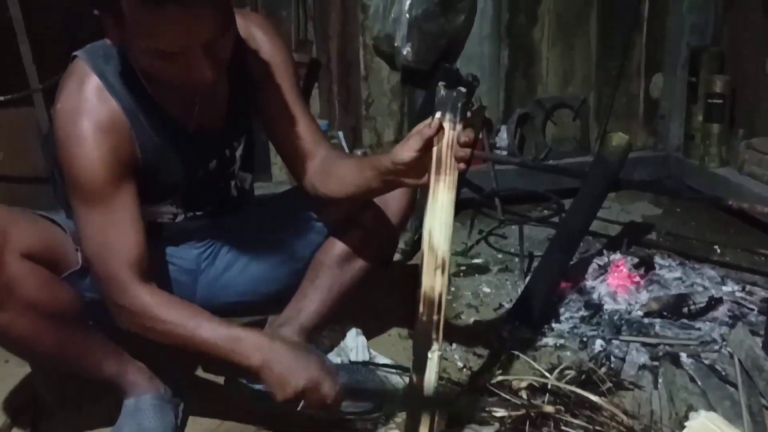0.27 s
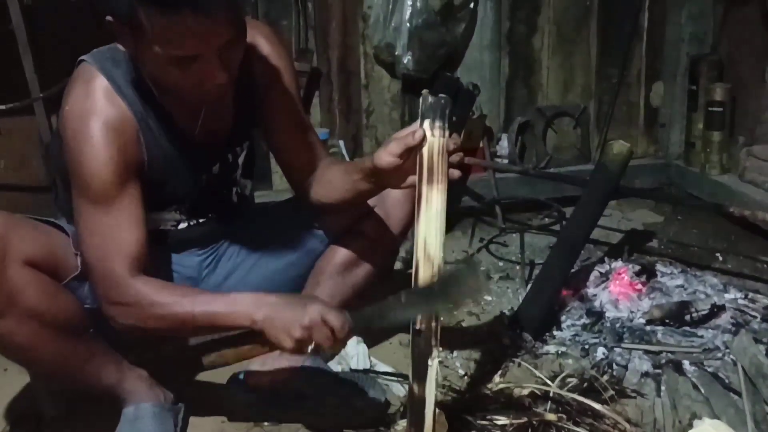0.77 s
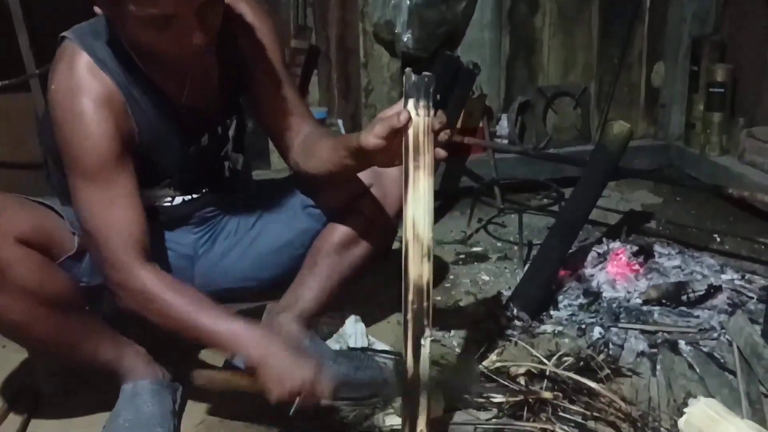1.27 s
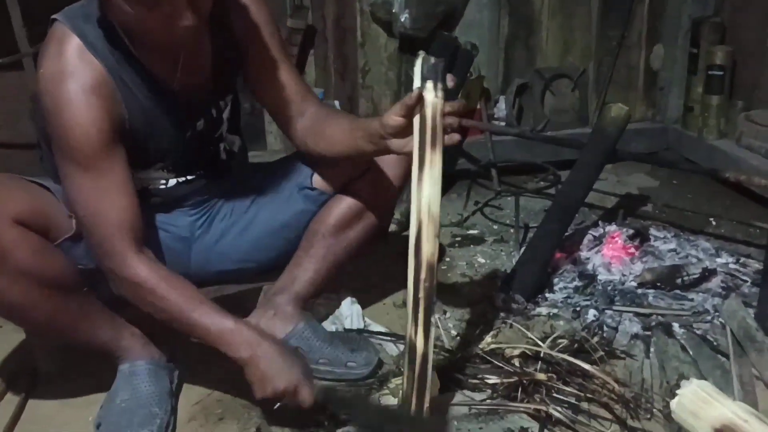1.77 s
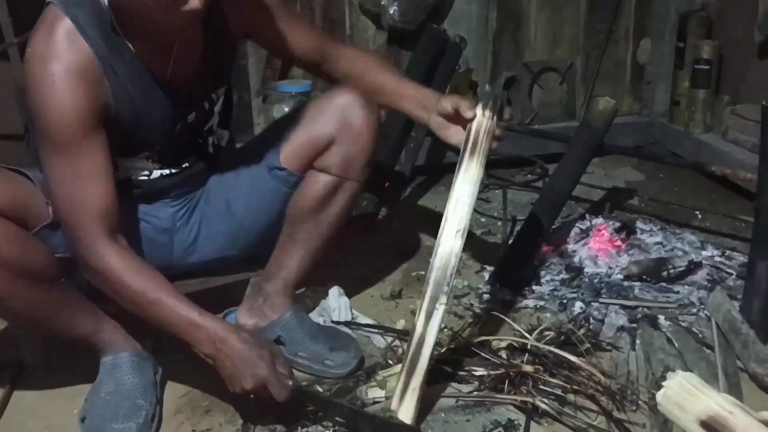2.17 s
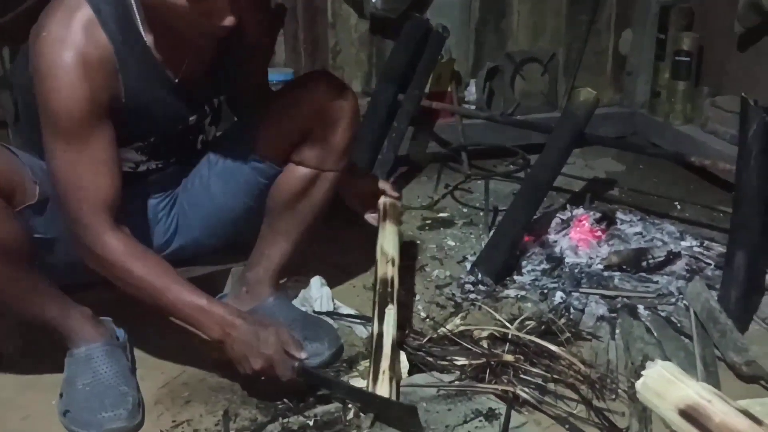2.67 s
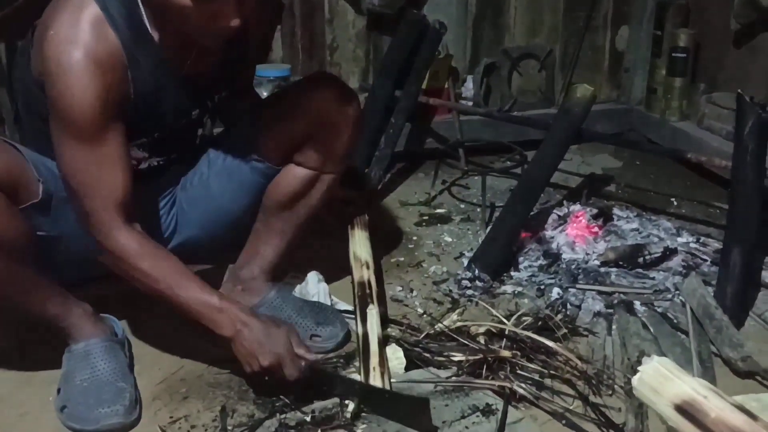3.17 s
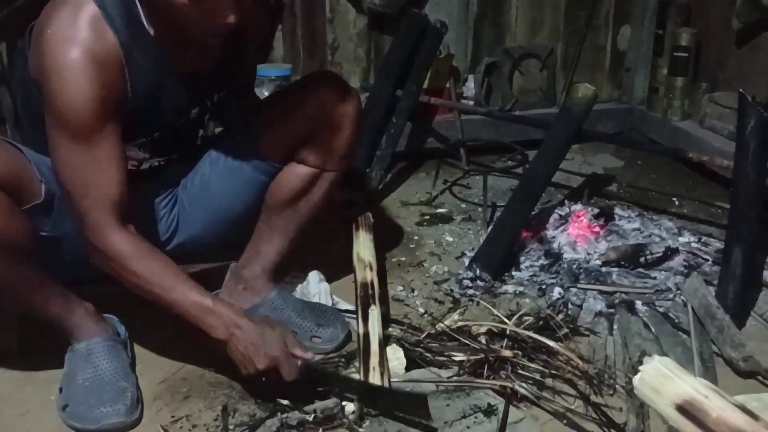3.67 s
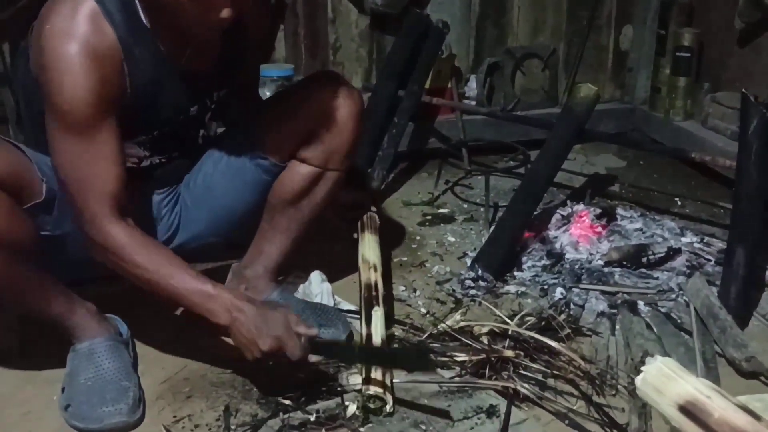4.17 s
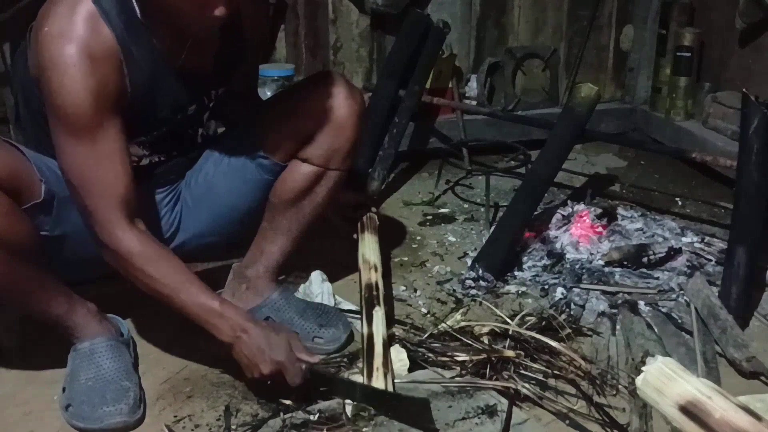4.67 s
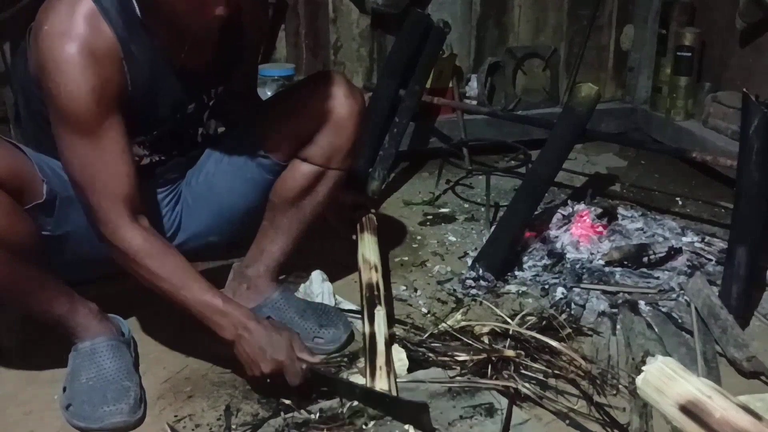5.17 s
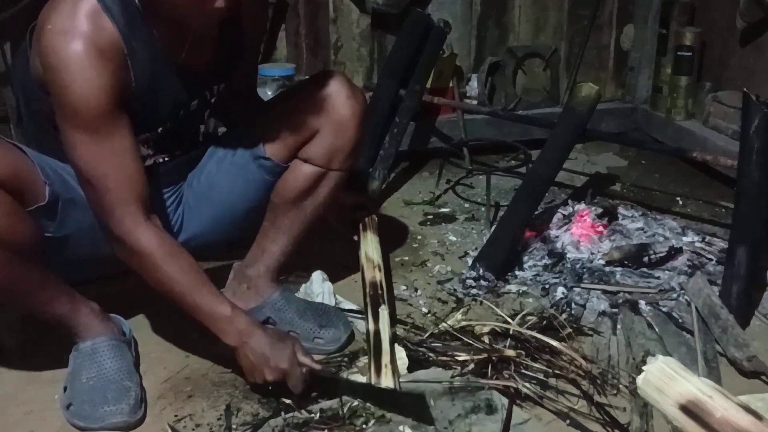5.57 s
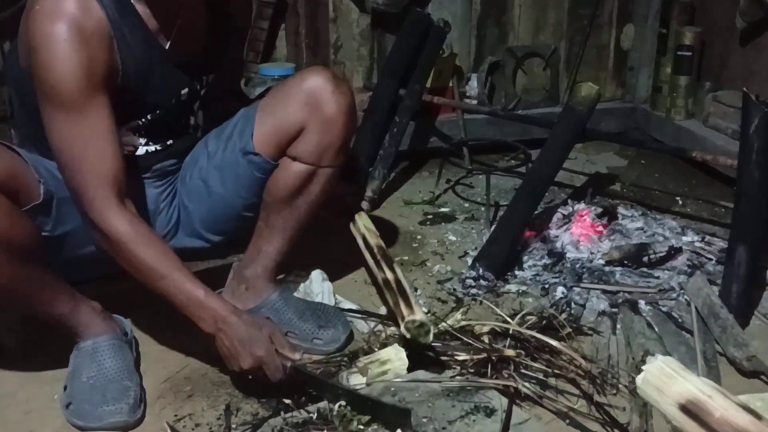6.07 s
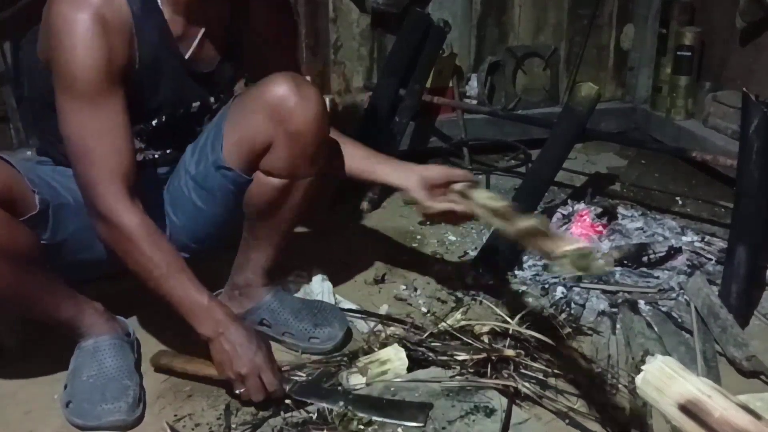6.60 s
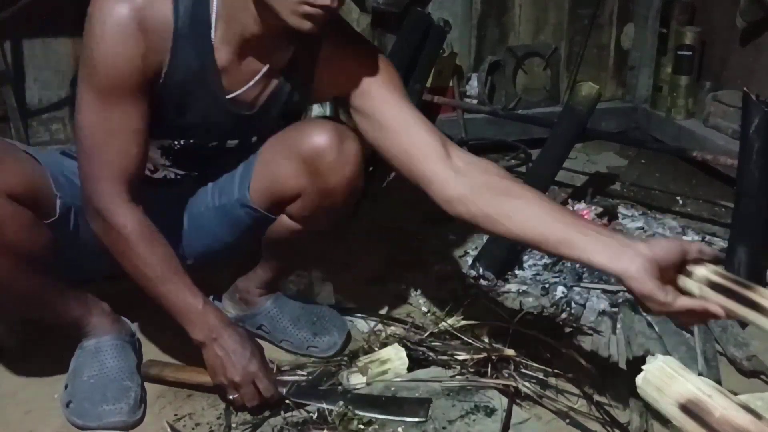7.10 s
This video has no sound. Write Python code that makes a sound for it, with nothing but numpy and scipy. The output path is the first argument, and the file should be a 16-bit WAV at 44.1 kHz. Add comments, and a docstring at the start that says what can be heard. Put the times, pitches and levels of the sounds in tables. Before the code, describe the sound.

A heavy blade scrapes and chops a dry bamboo tube, sharp woody cracks and brief steel ringing, over a faint gated hiss in a small shelter.

```python
"""Blade on a bamboo tube

A heavy blade shaves and chops a scorched bamboo tube that stands on stone, in a small shelter.
Strokes and drags are friction noise; blows excite fibre snaps and the modes of tube, ground and blade.
Sparse echoes surround them, and a faint noise lies between and under the sounds. A small microphone
overloads on the hardest blows and its suppressor cuts the fading tails."""
import sys
import numpy as np
from scipy import signal
from scipy.io import wavfile
from scipy.ndimage import uniform_filter1d

SR = 44100
rng = np.random.default_rng(int(sys.argv[2]) if len(sys.argv) > 2 else 0)


def volts(x):
    """Linear amplitude factor 10**(x/20) for a level x in dB, scalar or array-like."""
    e = np.asarray(x, float) / 20
    return 10 ** e


def inscribe(sig):
    """Save sig as 16-bit PCM at rate SR to the path in sys.argv[1].

    A 1-D sig is mono; a 2-D sig holds one channel per row.
    Samples are clipped to [-1, 1] before scaling.
    """
    pcm = np.round(np.clip(np.atleast_2d(sig).T, -1, 1) * 32767)
    wavfile.write(sys.argv[1], SR, pcm.astype(np.int16))


N = 323684

# blows and knocks, before the fixed gain of each part; the last three levels are relative to the crack:
# start_s, crack_db, tube_db, thud_db, splinter_db
BLOWS = [(0.163, -40.5, -13, -25, -12), (0.2317, 1, -4, -39.5, -33.5), (1.0792, -34, -6.5, -18, -16),
         (1.402, -39.5, -18, -23, -15.5), (1.4212, -24, -12.5, -23, -12), (1.4947, -12.5, 7, -46, -24),
         (1.556, -26, -2, -20, -14), (1.7624, -40, -15, -15.5, -10.5), (1.9645, -14, 2.5, -22.5, -30),
         (2.9862, -47, -35, -33.5, -7), (3.1464, -8, -22.5, -27, -8), (3.314, -49, -20, -28, -22),
         (3.6162, -10.5, -21.5, -27, -6), (3.655, -14.5, -6, -14, -15), (3.767, -56, -16, -23, 13.5),
         (4.0865, -7, -15, -18, -9), (4.603, -5.5, -12.5, -17.5, -8), (4.6526, -23.5, 6, -3, -21),
         (5.136, -9, -5.5, -14, -8), (5.676, 1.5, -4, -34, -25.5), (5.928, -33.5, -7, -20, -10),
         (5.9893, -33, -2, -22, -2), (6.2405, -48, 0.5, -9.5, -12), (6.36, -55, -21.5, -25, -10),
         (6.559, -33, 14.5, -14.5, -13), (6.6619, -39.5, -28.5, -15.5, -13.5)]
# modes of the steel blade, levels before any tilt: pitch_hz, level_db, t60_s
BLADE_MODES = [(812, -4, 1.), (826, -2, 1.2), (910, -3, .7), (975, -2, 1.1), (1145, -2, .7), (1394, 1, 1.),
               (1540, 1, .5), (1940, 2, .15), (2550, 1, .12), (2750, 0, .1), (4780, -5, .09),
               (5600, -4, .08), (7100, -7, .06), (8570, -5, .07), (9730, -2, .08), (11860, -5, .08)]


def evened(x):
    """Normalisation to unit root-mean-square value."""
    return x / np.sqrt(np.mean(x ** 2) + 1e-20)


def read(points, hz):
    """Interpolation of a curve on a logarithmic frequency axis."""
    f, value = np.transpose(points)
    return np.interp(np.log(hz + 1), np.log(f + 1), value)


def pulse(spectrum):
    """Minimum phase: the causal impulse response of a magnitude spectrum, scaled to energy 1."""
    level_db = np.maximum(read(spectrum, np.fft.rfftfreq(4096, 1 / SR)), -100)
    log_gain = level_db * np.log(10) / 20
    full = np.r_[log_gain, log_gain[-2:0:-1]]
    # the phase is the Hilbert transform of the log magnitude
    taps = np.fft.ifft(np.exp(np.conj(signal.hilbert(full)))).real[:2048]
    return taps / np.linalg.norm(taps)


def ring(modes, tilt_db=0., rise_s=0.00032):
    """Modal superposition: dying sines of energy 1; the tilt (dB an octave) says which the touch favours."""
    t = np.arange(SR) / SR
    taps = 0
    for k, (hz, db, t60) in enumerate(modes):
        decay = volts(db + tilt_db * np.log2(hz) - 60 * t / t60)
        # neighbours in opposite phase leave no notch between them
        taps = taps + (-1) ** k * decay * np.sin(2 * np.pi * hz * t)
    taps = taps * (1 - np.exp(-t / rise_s))
    return taps / np.linalg.norm(taps)


def through(x, taps):
    """Linear filtering: convolution of a source with an impulse response."""
    return signal.oaconvolve(x, taps)[:N]


def grit(per_s, spread_db, size):
    """Shot noise: random clicks of either sign, a few of them large, rms 1."""
    draw = rng.random((size, 3))
    happens = draw[:, 0] < per_s / SR
    sign = np.sign(draw[:, 1] - .5)
    height = volts(-spread_db * np.log(draw[:, 2] + 0.0051))
    return evened(happens * sign * height)


def hardness(crack_db, tube_db):
    """Impact strength: 0 for a light touch, 1 for a blow that jars the whole tube."""
    return np.clip((crack_db + tube_db + 18.5) / 11, 0, 1)


def pressure(start_s, rise_s, hold_s):
    """Contact force: it rises to its full value at the start time, holds and dies; a hard blow ends it early."""
    release_s, lift_s, lift_fade_s = 0.13, 0.018, 0.015
    t = np.arange(N) / SR
    rising = 1 + (t - start_s) / max(rise_s, .003)
    dying = 1 - (t - start_s - hold_s) / release_s
    shape = np.clip(np.minimum(rising, dying), 0, 1)
    # the blade leaves the skin just before the next blow that is not light
    lifts = [b[0] - lift_s for b in BLOWS if b[0] > start_s and hardness(*b[1:3]) > 0]
    lift = min(lifts + [N / SR])
    return shape * np.clip(1 + (lift - t) / lift_fade_s, 0, 1)


def strokes():
    """Friction: dense grit under a moving edge hisses and rasps; sparse catches make the blade sing."""
    # the blade runs along the skin, timed at full pressure; body is relative to the hiss:
    # start_s, rise_s, hold_s, hiss_db, body_db
    blade_strokes = [(0.0, .01, 0.11, -51.5, 3), (.172, 0.025, 0.13, -48, 8), (.38, 0.076, 0.0025, -57, 12),
                     (.454, .006, 0.055, -47.5, 11), (.584, 0.016, 0.037, -47.5, 5.5),
                     (.695, 0.051, .01, -33.5, -18.5), (.725, 0.07, 0.029, -31, 2.5),
                     (.965, 0.097, 0.043, -58.5, -6), (1.08, 0.063, 0.017, -36, 5.5),
                     (1.29, 0.11, 0.014, -58, 0), (1.43, 0.07, 0.022, -31, 1.5),
                     (1.565, 0.012, 0.053, -52, 12.5), (1.764, 0.0024, 0.051, -66.5, 7.5),
                     (1.87, 0.092, 0.1, -40, 2), (5.85, 0.065, 0.03, -58.5, 13), (5.93, 0.13, .11, -59, 15),
                     (6.242, 0.012, 0.057, -73, 10.5)]
    # the tube drags over the ground, timed at full pressure; body is relative to the hiss:
    # start_s, rise_s, hold_s, hiss_db, body_db
    ground_drags = [(2.337, 0.152, 0.17, -58, 14), (2.772, 0.054, 0.048, -75.5, 8),
                    (2.95, 0.082, 0.19, -81, 18.5), (7.068, 0.17, 0.2, -71.5, 8.5)]
    # spectrum of the low part of a stroke, only its shape counts: frequency_hz, level_db
    rasp_spectrum = [(35, -59), (60, -19), (352, -23.5), (700, -25), (1140, -19), (1440, -15), (2310, -9.5),
                     (2810, -3.5), (3430, -19.5), (4500, -27.5), (5850, -52.5), (9900, -120)]
    # spectrum of the high part of a stroke, only its shape counts: frequency_hz, level_db
    hiss_spectrum = [(2060, -28.5), (3500, -13.5), (5620, -2.5), (6700, 5), (7930, 2), (8400, 5),
                     (13800, -6), (15900, -7), (16500, -71)]
    hiss_off_db, body_off_db = -89.5, -78.5  # levels that vanishing pressure approaches
    sing_db = -8.5  # drive of the blade's singing, relative to the hiss

    level = np.zeros((3, N))  # hiss, rasp, singing
    for k, (start_s, rise_s, hold_s, hiss_db, body_db) in enumerate(blade_strokes + ground_drags):
        push = pressure(start_s, rise_s, hold_s)
        on = np.flatnonzero(push)
        hiss_level = volts(hiss_off_db + (hiss_db - hiss_off_db) * push[on])
        level[0, on] += hiss_level
        level[1, on] += volts(body_off_db + (hiss_db + body_db - body_off_db) * push[on])
        level[2, on] += hiss_level * volts(sing_db) * (k < len(blade_strokes))  # drags do not sing

    # the edge catches and slips
    catch = volts(2.8 * evened(uniform_filter1d(rng.standard_normal((2, N)), 300)))
    rubbing = grit(6200, 5.5, size=N) + 1.1 * rng.standard_normal((2, N))
    hiss, rasp = evened(catch * rubbing) * level[:2]
    sing = grit(300, 3., size=N) * level[2]
    rubs = through(hiss, pulse(hiss_spectrum)) + through(rasp, pulse(rasp_spectrum))
    return rubs + through(sing, ring(BLADE_MODES[7:], 9.))  # the short upper modes of the pressed blade


def air():
    """Filtered noise: random spectral frames follow a fixed colour and drift in patches."""
    # spectrum of the faint noise, only its shape counts: frequency_hz, level_db
    air_spectrum = [(30, -32.5), (60, 0.5), (130, 0), (300, -8.5), (900, -14), (1800, -14.5), (2250, -9.5),
                    (2480, -7), (2600, -1.5), (2720, -10), (3000, -15), (3500, -25.5), (4800, -35.5),
                    (6500, -24.5), (7100, -14), (7900, -14.5), (8500, -22.5), (9500, -42), (16000, -40)]
    # level of the faint noise between and under the sounds: time_s, level_db
    air_level = [(0, -52.5), (.87, -67), (1.301, -64), (1.7, -68), (2.301, -59.5), (3.0, -70),
                 (3.45, -70.5), (3.9, -70.5), (4.3, -61), (5.0, -68.5), (5.35, -56.5), (5.6, -73),
                 (6.1, -61.5), (7.34, -68.5)]
    frames, hz = N // 256 + 5, np.fft.rfftfreq(1024, 1 / SR)
    real, imaginary, patches = rng.standard_normal((frames, 513, 3)).T
    # smooth over frequency, then over time
    patches = evened(uniform_filter1d(uniform_filter1d(patches, 12, 0), 14, 1))
    z = (real + 1j * imaginary) * volts(read(air_spectrum, hz)[:, None] + 1.5 * patches)
    noise = signal.istft(z, nperseg=1024, noverlap=768)[1][:N]
    level = volts(np.interp(np.arange(N) / SR, *np.transpose(air_level)))
    return level * evened(noise)


def shelter(x):
    """Reverberation: sparse echoes, each band dying at its own speed; three patterns take turns."""
    # reverberation time of the shelter: frequency_hz, t60_s
    decay_times = [(100, 0.44), (260, 0.23), (700, 0.3), (1840, 0.25), (4850, 0.24), (12800, 0.31)]
    turns_per_s = .7
    taps = np.zeros((3, SR // 2))
    # one echo of random sign in every 20 samples
    at = np.arange(200, SR // 2 - 20, 20) + rng.integers(0, 20, (3, (SR // 2 - 201) // 20))
    np.put_along_axis(taps, at, rng.choice([-1., 1.], at.shape), 1)
    hz, t, z = signal.stft(taps, SR, nperseg=512)
    decay = volts(-60 * t / read(decay_times, hz)[:, None])
    tails = signal.istft(z * decay, SR, nperseg=512)[1]
    turn = 2 * np.pi * (turns_per_s * np.arange(N) / SR + np.arange(3)[:, None] / 3)
    share = np.sqrt(2 / 3) * np.cos(turn)  # the squares sum to 1
    return sum(through(x * w, tail / np.linalg.norm(tail)) for w, tail in zip(share, tails))


def tube(start_s):
    """Modal excitation: what the tube answers to a hard and to a light touch at this moment."""
    # modes of the tube before each blow's variation and pressing: pitch_hz, level_db, t60_s
    tube_modes = [(471.5, 0, 0.033), (579.5, -9, 0.14), (695, 0.5, 0.051), (844, 0.5, 0.1),
                  (1168, -3.5, .07), (1368, -0.5, 0.11), (1487, -2, .045), (1894, -4.5, 0.086),
                  (2263, -4.5, 0.034)]
    # body of a hard blow, only the shape of the spectrum counts: frequency_hz, level_db
    knock_spectrum = [(180, -35.5), (350, -11.5), (500, -9.5), (850, 5.5), (1400, 11), (2100, 6.5),
                      (2800, -28), (4000, -50), (7000, -100)]
    spot_db, spot_detune = 4., .025  # each blow lands elsewhere and favours other modes
    hz, db, t60 = np.transpose(tube_modes)
    pressed = 3.0 < start_s < 5.5  # seconds in which the tube is pushed onto the stone
    luck = rng.standard_normal((2, len(hz))) * (1 if pressed else .3)
    damping = .5 if pressed else 1  # factor on the ring time
    modes = np.c_[hz * (1 + spot_detune * luck[0]), db + spot_db * luck[1], t60 * damping]
    body = volts(-2.37) * ring(modes)[:SR // 3]
    body[:2048] += pulse(knock_spectrum)
    light = ring(modes, -9.5)[:SR // 3] + volts(-15) * body
    return volts(22) * body, volts(18.5) * light


def blows():
    """Impact and fracture: a dying burst of snaps drives each part; returns blows and bare first contacts."""
    # modes of the ground: pitch_hz, level_db, t60_s
    ground_modes = [(131, -1, 0.082), (172, -1, 0.07), (213, -2.5, 0.085), (261, -7, 0.083),
                    (329, -7, 0.11)]
    # spectrum of a fibre crack, only its shape counts: frequency_hz, level_db
    crack_spectrum = [(500, -37.5), (1200, -15), (2000, -7), (2500, 0.5), (2900, 2), (3400, -14.5),
                      (4000, -33), (5500, -40.5), (9000, -86.5)]
    # spectrum of bright splinters, only its shape counts: frequency_hz, level_db
    splinter_spectrum = [(2060, -22), (3500, -8.5), (4600, -17.5), (6870, -11.5), (8570, -12.5),
                         (9820, -21.5), (13100, -20), (15800, -37), (16100, -42), (16500, -87.5)]
    # decay constants: fibres snap on after the bite, a hard blow jolts tube and ground, a light one only touches
    splintering_s, jolt_s, tap_s = .009, .005, .001
    crumbling_s, crumbling_db = .026, -14  # a few late snaps as the split settles

    out, t = np.zeros((2, N + 2 * SR)), np.arange(8000) / SR
    # rows: crack, tube struck hard, tube struck lightly, thud, splinters
    lasts = np.array([splintering_s, jolt_s, tap_s, jolt_s, splintering_s])[:, None]
    crack = volts(16.0) * pulse(crack_spectrum)
    thud = volts(23.5) * ring(ground_modes, rise_s=.012)
    bright = volts(13) * pulse(splinter_spectrum)
    for start_s, crack_db, tube_db, thud_db, bright_db in BLOWS:
        snaps = grit(5000, 2.5, size=len(t)) * np.exp(-t / lasts)
        late = grit(450, 3.5, size=len(t)) * np.exp(-t / crumbling_s)
        snaps[[0, 4]] += volts(crumbling_db) * late
        snaps /= np.linalg.norm(snaps, axis=1)[:, None] + 1e-9
        snaps[:, 0] = [0.33, 0.41, 1.0, 0.68, 0.63]  # the first contact
        hard = hardness(crack_db, tube_db)  # a hard blow wakes high modes
        level = volts(crack_db + np.array([0, tube_db, tube_db, thud_db, bright_db]))
        gains = level * np.sqrt([1, hard, 1 - hard, 1, 1])
        at = round(start_s * SR)
        for gain, drive, taps in zip(gains, snaps, [crack, *tube(start_s), thud, bright]):
            out[0, at:at + len(t) + len(taps) - 1] += gain * signal.fftconvolve(drive, taps)
            out[1, at:at + len(taps)] += gain * taps
    return out[:, :N]


def rings():
    """Free vibration: the whole blade rings on after the edge bites hardest."""
    # ringing blows; where the blow lands decides the tilt: start_s, level_db, tilt_db_per_octave
    blade_rings = [(.2317, -8, -6), (1.4952, -15, -5), (1.9651, -24, -4), (5.676, -4, .5)]
    out = np.zeros(N + SR)
    for start_s, db, tilt_db in blade_rings:
        out[round(start_s * SR):][:SR] += volts(db) * ring(BLADE_MODES, tilt_db)
    return out[:N]


def clinks():
    """Impulse response: each light tap wakes the upper modes of the blade."""
    # light taps on the blade: start_s, level_db
    blade_taps = [(1.7631, -41), (5.9266, -28), (5.9894, -31), (6.04, -35), (6.2393, -35), (6.559, -35)]
    impulses = np.zeros(N)
    for start_s, db in blade_taps:
        impulses[round(start_s * SR)] = volts(db)
    return through(impulses, ring(BLADE_MODES[10:], -3.))


def bumps():
    """Damped oscillation: each row of the table is one dying tone; a knock may have several."""
    # tones of the knocks as the tube is set down or jumps back: start_s, peak_db, pitch_hz, t60_s
    knock_tones = [(2.455, -16, 394, 0.0036), (3.6565, -20, 520, .005), (3.66, -29, 720, .17),
                   (4.6535, -11, 950, .003), (4.658, -27, 745, .17), (6.04, -46, 469, 0.08),
                   (6.237, -44.5, 495, 0.066), (6.254, -38, 474, 0.062)]
    out = np.zeros(N)
    for start_s, peak_db, hz, t60 in knock_tones:
        at = round(start_s * SR)
        tone = ring([(hz, 0, t60)])
        out[at:][:len(tone)] += (volts(peak_db) * tone / tone.max())[:N - at]
    return out


def scene():
    """Superposition: direct sounds, the echoes they excite and the faint noise add up."""
    hits, contacts = blows()
    rubs = strokes()
    knocks = bumps()
    direct = hits + rubs + knocks + clinks() + rings()
    echoed = volts(-1.0) * contacts + volts(-32.0) * rubs + volts(-14.5) * knocks
    return (direct + shelter(echoed) + air())[None]


def roll_off(x):
    """The treble ends steeply here."""
    return signal.sosfilt(signal.butter(12, 16770, fs=SR, output="sos"), x)


def record(dry):
    """Saturation and downward expansion: bass cut, overload, and a suppressor that shuts on faded tails."""
    x = signal.sosfilt(signal.butter(3, 90, "high", fs=SR, output="sos"), dry)
    x = 1.075 * np.tanh(x / 0.99 + (x / 0.57) ** 3 / 3)  # overload
    x = signal.sosfilt(signal.butter(2, 60, "high", fs=SR, output="sos"), x).clip(-.88, .88)

    power_db = 10 * np.log10(abs(uniform_filter1d(x[0] ** 2, 700)) + 1e-12)
    fall = np.arange(N) * 37.0 / SR  # the remembered peak sinks 37 dB a second
    peak_db = np.maximum.accumulate(power_db + fall) - fall
    # a fixed while after a sudden rise the suppressor shuts 7 dB sooner
    sudden = (power_db - np.roll(power_db, 500) > 18) & (power_db > -35)
    since_s = (np.arange(N) - np.maximum.accumulate(np.arange(N) * sudden)) / SR
    eager_db = 7 * ((since_s > .178) & (since_s < .212))
    under_db = eager_db + peak_db - 34.5 - power_db
    # 5 dB of cut for each dB under the threshold, down to a floor of -65 dB
    cut_db = np.maximum(np.minimum(5 * under_db, power_db + 65), 0)
    cut_db = uniform_filter1d(cut_db, 300)
    return roll_off(x * volts(-cut_db))


dry = scene()
out = record(dry)
inscribe(out)
```